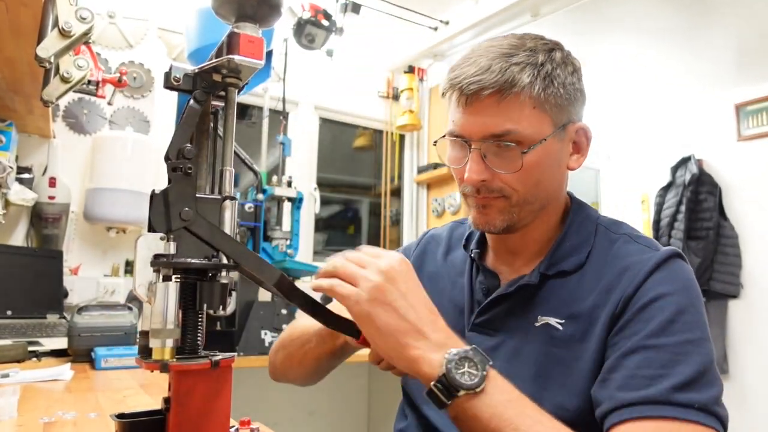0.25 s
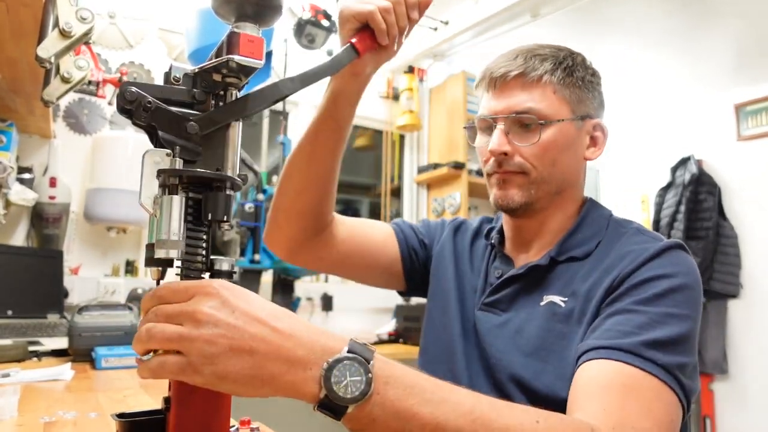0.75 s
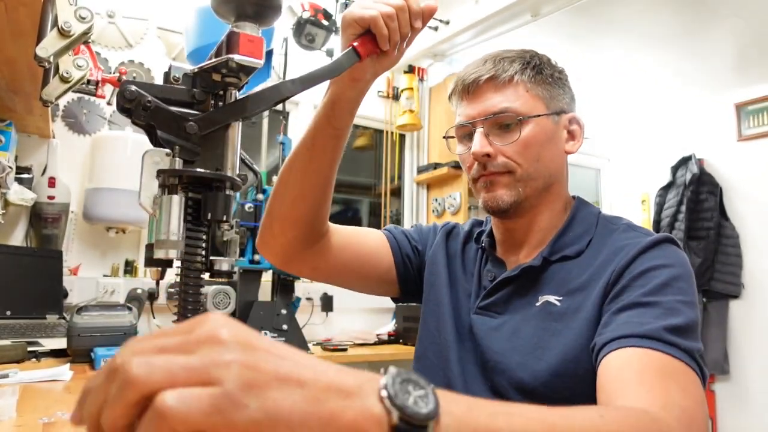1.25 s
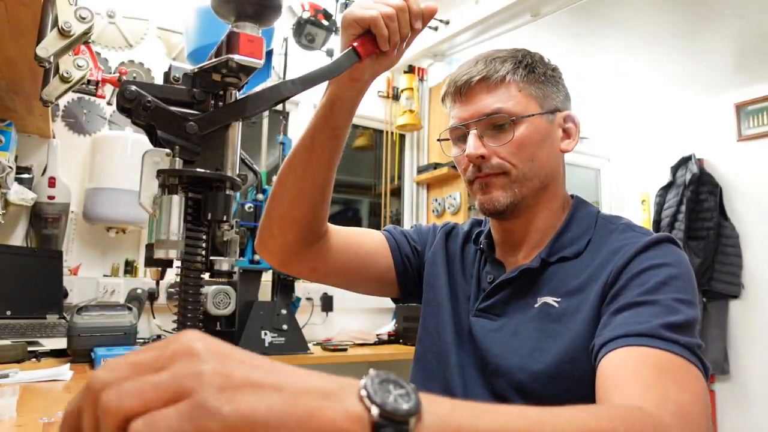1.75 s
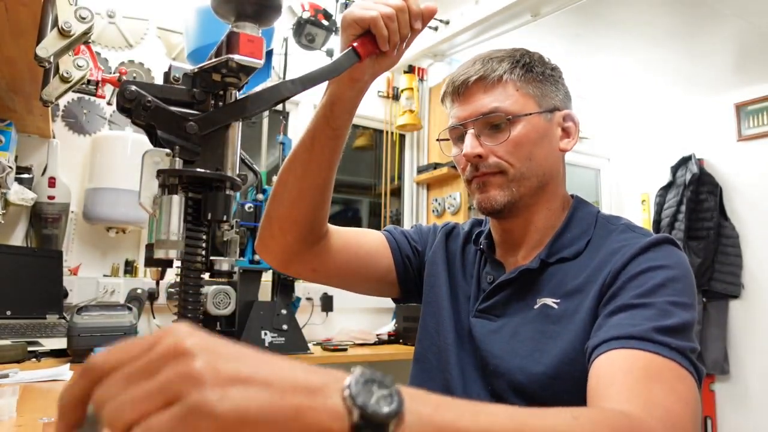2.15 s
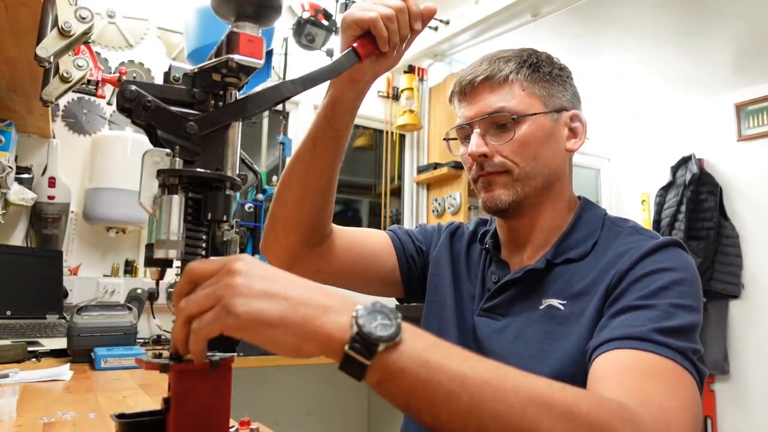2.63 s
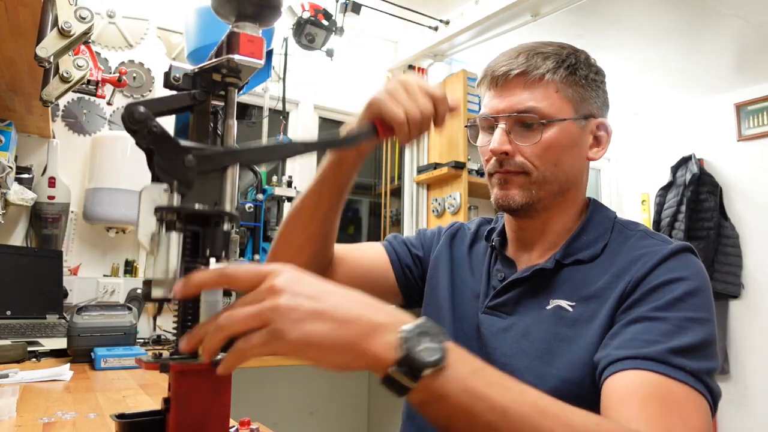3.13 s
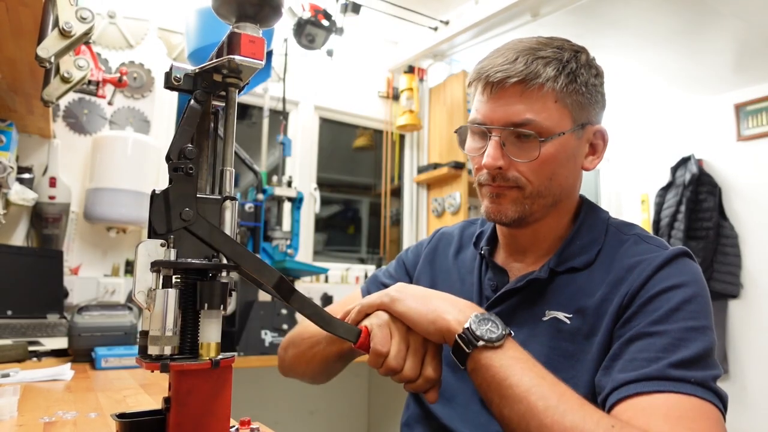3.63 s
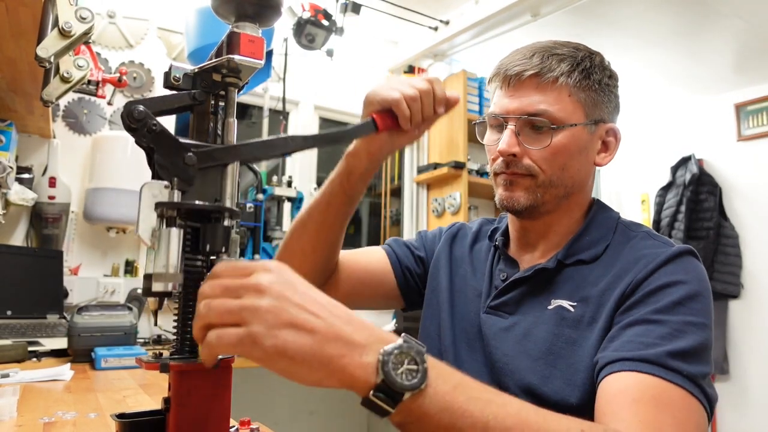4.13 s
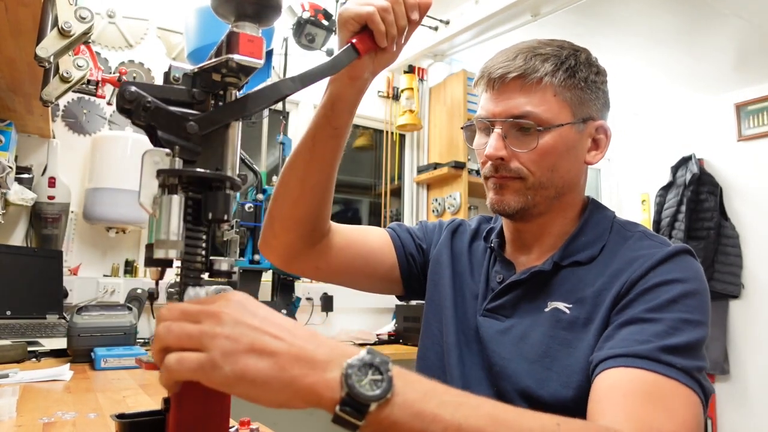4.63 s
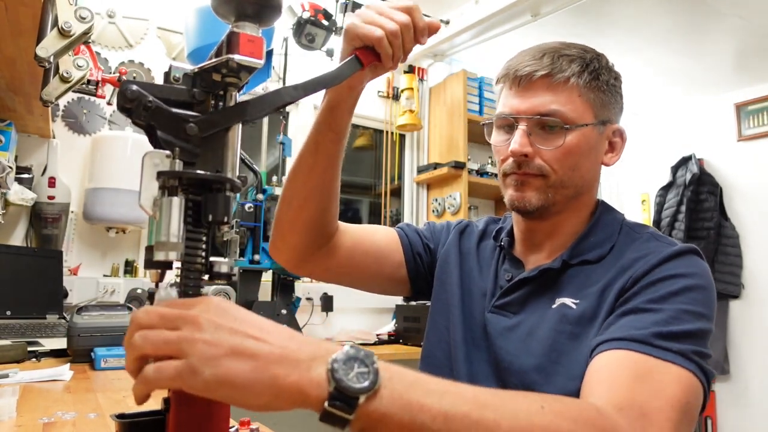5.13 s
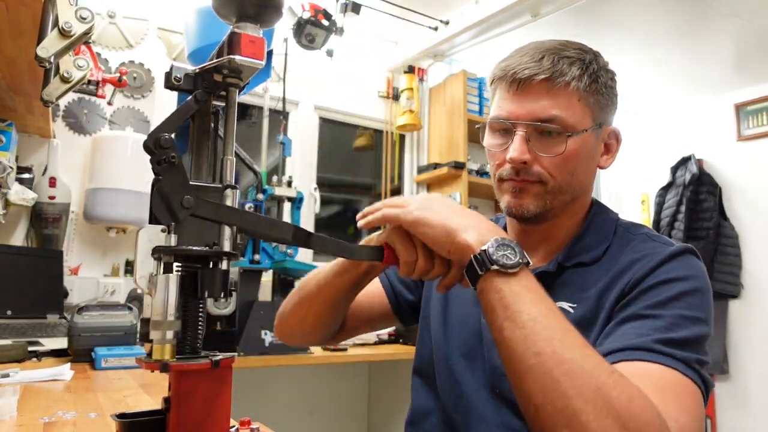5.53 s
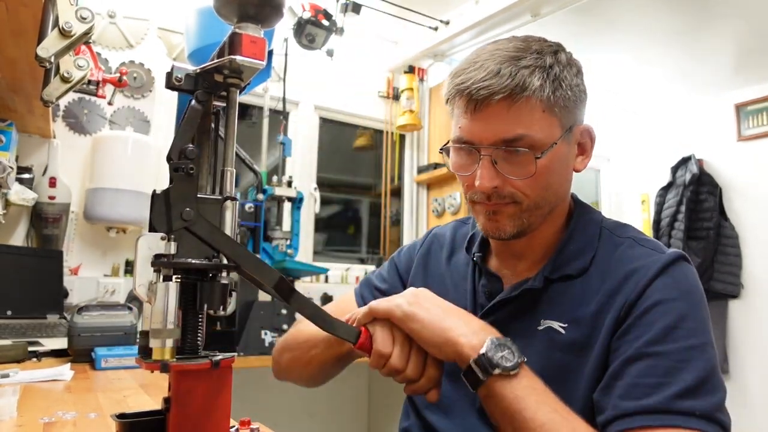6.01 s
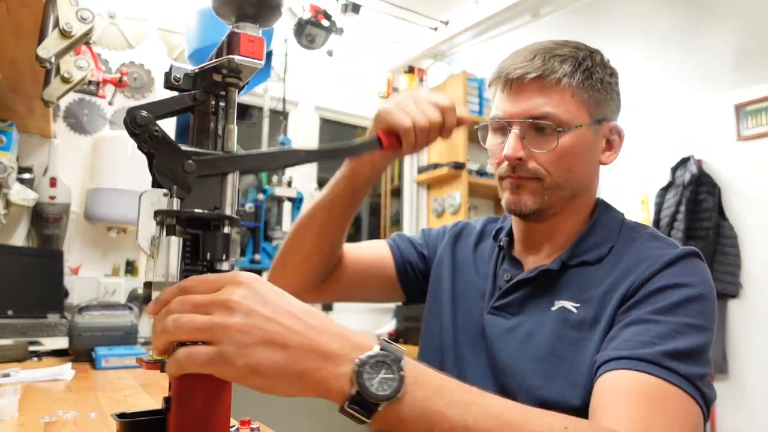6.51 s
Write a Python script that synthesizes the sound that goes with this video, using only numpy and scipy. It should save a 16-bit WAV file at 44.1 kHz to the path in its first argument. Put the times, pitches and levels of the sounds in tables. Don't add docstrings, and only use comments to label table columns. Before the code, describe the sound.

A lever-operated bench press bangs against its stops in a small workshop, loose linkage rattling between blows while light parts knock and shuffle.

```python
import sys
import numpy as np
from scipy import signal
from scipy.fft import rfft, irfft, next_fast_len
from scipy.io import wavfile
from scipy.ndimage import uniform_filter1d, map_coordinates

SR = 44100
rng = np.random.default_rng(int(sys.argv[2]) if len(sys.argv) > 2 else 0)


def invert_db(x):
    u = np.asarray(x, float) / 20
    return 10 ** u


def store_pcm(level_fs):
    pcm = np.round(np.clip(level_fs, -1, 1) * 32767).astype(np.int16)
    wavfile.write(sys.argv[1], SR, np.atleast_2d(pcm).T)


N = 298116


def unit(x):
    return x / np.sqrt(np.mean(x ** 2) + 1e-20)


def along(points, hz):
    f, v = np.transpose(points)
    return np.interp(np.log(hz + 1), np.log(f + 1), v)


def filtered(x, response):
    m = next_fast_len(N + SR // 2)
    return irfft(rfft(x, m) * response(np.fft.rfftfreq(m, 1 / SR)), m)[..., :N]


def noise(spectrum):
    white = rng.standard_normal((2, N))
    return unit(filtered(white, lambda hz: invert_db(along(spectrum, hz))))


def add(out, s, sound):
    part = out[:, round(s * SR):][:, :sound.shape[1]]
    part += sound[:, :part.shape[1]]


def ringing(hz, peaks):
    return sum(invert_db(db) * 1j * hz * width / (centre * centre - hz * hz + 1j * hz * width)
               for centre, width, db in peaks)


def resonant(x, peaks):
    return filtered(x, lambda hz: 1 + ringing(hz, peaks))


# frequency in Hz, t60 in seconds.
ROOM_T60 = [(100, 0.57), (300, 0.26), (1000, 0.3), (4000, 0.36), (9000, 0.38), (15000, 0.22)]


def blow(db, thump_db, knock_db, bright_db, crack_db, sub_db=0, body_db=7, room_db=-8, deep_db=0, edge_db=0):
    t = np.arange(SR * 3 // 5) / SR
    low_db = thump_db + sub_db
    colour = [(40, low_db + deep_db), (150, low_db - 1.5), (450, thump_db + 11.0),
              (1000, knock_db + 7.0), (1500, knock_db + 5.5 + edge_db), (2100, -0.048), (6000, 0.32),
              (11000, bright_db + 4.0), (16000, bright_db + 2.0)]
    hz, frame_s, z = signal.stft(rng.standard_normal((3, len(t))), SR, nperseg=256)
    uneven_db = 2.2 * rng.standard_normal(len(hz))
    z = z * invert_db(along(colour, hz) + uneven_db)[:, None]
    fall_db = 60 * frame_s / along(ROOM_T60, hz)[:, None]
    late_db = room_db - 42.5 - 60 * frame_s / 3.7
    z[1:] *= invert_db(room_db - fall_db) + invert_db(late_db)
    near, mid, side = signal.istft(z, SR, nperseg=256)[1][:, :len(t)]

    touches_per_s, touch_most = 350, 1.5
    size = np.minimum(rng.exponential(size=len(t)), touch_most)
    touches = 1.45 * size * (rng.random(len(t)) < touches_per_s / SR)
    chatter = 0.6 + signal.lfilter([1], [1, -0.975], touches)

    crack = uniform_filter1d(near, size=3) * invert_db(crack_db + 2 - 60 * t / 0.0037)
    near = crack + near * chatter * invert_db(body_db - 14.5 - 60 * t / 0.067)
    low, high = 1 + 0.12 * rng.standard_normal(2)
    near += invert_db(crack_db + thump_db - 14.5 - 60 * t / 0.045) * np.sin(2 * np.pi * 440 * low * t)
    near += invert_db(crack_db + knock_db - 12.5 - 60 * t / 0.019) * np.sin(2 * np.pi * 1100 * high * t)
    near *= 1 - np.exp(-t / 0.00065)
    swell = (1 - np.exp(-t / 0.00086)) * (1 - t / t[-1])
    return invert_db(db - 14) * np.array([near, swell * mid, swell * side])


def struck(sound, part, far):
    m = next_fast_len(sound.shape[1] + 2048)
    detune = 0.013 * rng.standard_normal()
    hz = np.fft.rfftfreq(m, 1 / SR) * (1 + detune)
    share = np.array([[1.3], [far], [far]])
    return irfft(rfft(sound, m) * (1 + share * ringing(hz, part)), m)


def contacts(rows, part, force_db, crack_db, shake_db, far):
    out = np.zeros((3, N))
    for s, db, thump_db, knock_db, bright_db in rows:
        hit = blow(db + force_db, thump_db, knock_db, bright_db, crack_db, shake_db,
                   deep_db=1.7 * shake_db - 4)
        add(out, s, struck(hit, part, far))
    return out


# start in seconds, peak in dB, thump 150-700 Hz in dB,
# knock 700-2000 Hz in dB, bright 8-15 kHz in dB.
SLAMS = [(0.0228, -17.5, 4, 0.5, -6), (0.0355, -12, -9, -1, -5.5), (0.0737, -17.5, -35, -2.5, -2),
         (0.055, -17, -16, -11, 1), (0.0962, -10, -17, -10, -3.5), (3.5855, -7, -6.5, 3.5, -16),
         (3.5991, -11.5, -8, -21, -1), (3.6347, -18, -43, -31, 1.5), (5.4807, -22, -5.5, 2, -11),
         (5.4909, -18.5, 0.5, 1.5, -7), (5.5162, -11, -10, -15, -3.5), (5.994, -15.5, 0.5, -4.5, -6),
         (6.0145, -12.5, -51, -5, -3), (6.0496, -18, -36, -4, 3), (6.0684, -12, -16, -10, -3.5)]
# frequency in Hz, width in Hz, level in dB.
RAM = [(2040, 170, -8), (7200, 300, -2.5), (858, 29, -2.5)]


def ram_slams():
    return contacts(SLAMS, RAM, force_db=15, crack_db=1.5, shake_db=4, far=.5)


LIFTS = [(0.4538, -12, -5, 3.5, -2), (0.4605, -13.5, 0.5, -1, -18), (0.4773, -3.5, -11, -3, -14),
         (0.4944, -6, -5.5, 3.5, -10), (0.5194, -8.5, -8, -1.5, -2), (0.535, -14, -1.5, 6.5, 4),
         (0.5731, -15, -20, -1, 0), (0.6094, -25.5, 9, 7.5, -10), (0.6384, -22, 0, 1.5, -16),
         (0.6784, -16.5, -14, -1.5, -2), (6.5834, -29, 10.5, 4, 0), (6.6528, -20, -10, 1.5, 0),
         (6.6912, -19.5, -9, -20, -11)]
LEVER = [(2270, 240, 5.4), (460, 78, 0.63)]


def lever_lifts():
    return contacts(LIFTS, LEVER, force_db=6, crack_db=2.5, shake_db=1, far=.6)


TOPS = [(0.7384, -2.5, 0, 1.5, -8), (0.752, -7.5, -12, -2, -11), (0.765, -7.5, -2, -4, -6),
        (0.7745, -2, -7, -4, -16), (0.787, -18, -7, -11, -2), (0.8001, -8, -11.5, 0.5, -8.5),
        (0.817, -15, -6, -5, -11), (0.8483, -24, -2, -3, -8), (0.8829, -16, -33, -10, -28),
        (0.9042, -18.5, -16, 0, 0.5), (4.3696, -21.5, 7, 11, -16), (4.3848, -13.5, 0.5, 1, -7.5),
        (4.3983, -10, 0, -3, -10.5), (4.4282, -17.5, 2, 0, -14), (6.7107, -26.5, 6.5, 4, -13.5),
        (6.7352, -17.5, 11, 13.5, -16), (6.7438, -10, 1, -6, -8)]
FRAME = [(9530, 190, 4.3), (2080, 470, 0.5), (440, 260, 0.61), (887, 18, 0.98)]


def top_stops():
    return contacts(TOPS, FRAME, force_db=7, crack_db=2.2, shake_db=-3, far=.6)


RETURNS = [
    (3.996, -30.5, 9.5, 11, -8),
    (4.0285, -16.5, 6, 9.5, -6),
    (4.0335, -18, -1, 10.5, -1),
    (4.0901, -27, -8, 6.5, 7),
    (4.1041, -23, -2, 3, 1),
    (4.111, -29, -11, 8, -2),
    (4.187, -28, 2, -1, -15),
]
LINKAGE = [(6350, 260, 15.5), (8340, 230, 9.2), (9250, 68, 4), (1130, 46, 2), (2300, 530, 10.7),
           (7200, 170, 3.4)]


def linkage_returns():
    return contacts(RETURNS, LINKAGE, force_db=3, crack_db=5, shake_db=-1, far=.45)


CLACKS = [
    (6.357, -33, -8, -12, -15),
    (6.364, -28, 2, 6.5, -27),
    (6.388, -9, 5.5, 1, -3.5),
    (6.3995, -10, -6, -7, -12),
    (6.4122, -5, -9.5, -0.5, -15),
    (6.432, -14, -6, -1, -18),
    (6.4562, -13, -2, 7, -17),
    (6.4605, -6.5, -14.5, 3.5, -4),
    (6.521, -29.5, 3, 3, -5),
]
TOGGLE = [(476, 57, 6.9), (847, 43, 2.7), (2000, 470, 4), (4720, 81, 1), (6350, 150, 8), (11100, 68, 1.5)]


def toggle_clacks():
    return contacts(CLACKS, TOGGLE, force_db=3, crack_db=5, shake_db=-1, far=.6)


SNAPS = [
    (3.8934, -5, -12, -6.5, -21),
    (5.1709, -25.5, -2, -4, -13),
    (5.6164, -10, -40, -3.5, -15),
]
CATCH = [(885, 60, 2.2), (1610, 20, 1.3), (2250, 240, 2), (2810, 130, 6.3), (3970, 47, 1.8)]


def catch_snaps():
    return contacts(SNAPS, CATCH, force_db=1.5, crack_db=6, shake_db=3, far=.8)


SEATS = [
    (3.2333, -25.5, 0, -3, 3.5),
    (3.3274, -28, -20, -2, -3),
    (3.337, -21.5, -13, 0, -26),
    (3.3785, -9.5, -15, -5.5, -7),
    (3.533, -23.5, -9.5, 2.5, -20),
    (3.540, -34, -14, -1, 6),
]
PLATE = [(2170, 610, 8.2), (2750, 350, 4.2), (3650, 290, 4.1), (5400, 340, 3.2), (7200, 480, 4),
         (400, 72, 1.4)]


def shell_seats():
    return contacts(SEATS, PLATE, force_db=1.5, crack_db=6, shake_db=3, far=1.2)


DROPS = [
    (1.6102, -32, -13, 3, -34),
    (1.6245, -36, -1, 1, -13),
    (1.6581, -4, -3.5, -6.5, -15),
    (1.678, -10, -6, 4, -37),
    (1.7141, -16, 4.5, 12, -30),
    (1.7418, -22, 4, 14, -10),
    (1.647, -37, -13, 0, -15),
    (1.759, -37, 12, 6, -13),
    (1.822, -58, -9, 5, -16),
]
BIN = [(178, 17, 13.3), (443, 30, 5.8), (654, 70, 2.5), (1060, 42, 1.6), (1283, 81, 3.5), (2350, 480, 9.5)]


def bin_drops():
    return contacts(DROPS, BIN, force_db=3, crack_db=4.5, shake_db=-7, far=.8)


SHELLS = [
    (2.7337, -22, -23, -5, 0),
    (2.9379, -22, -5, -2, -20),
    (2.9495, -18.5, 5, 4, -3.5),
    (2.955, -16.5, -2.5, 2.5, -53),
    (3.1057, -11.5, -4, 1, -4),
    (4.7726, -20.5, -7.5, -10.5, -13),
    (5.1604, -28, -12, -13, -3.5),
    (5.2801, -9.5, -2.5, -3, 1),
    (5.3746, -19, -5.5, -12, 0),
]
HULL = [(450, 180, 2.4), (870, 330, 5.3), (2300, 770, 5.7), (3900, 170, 1), (6200, 2900, 3.7)]


def shell_knocks():
    return contacts(SHELLS, HULL, force_db=3, crack_db=5.5, shake_db=-2, far=.6)


STANDS = [
    (2.5636, -7.5, -21, -12, -1),
    (2.607, -26, -8, -38, -9),
]
BASE = [(315, 29, 6.6), (2300, 400, 5), (2720, 190, 2.9), (5460, 500, 1.5), (8300, 620, 1.5),
        (9950, 540, 1.5)]


def shell_stands():
    return contacts(STANDS, BASE, force_db=1.5, crack_db=6, shake_db=3, far=.9)


PICKS = [
    (2.1603, -30.5, -6, -6, -38),
    (2.176, -33, -4, -8, -22),
    (2.186, -30.5, -9, -7, -7),
    (2.192, -32.5, -6, -4, -13),
]
TRAY = [(4500, 390, 12), (3300, 160, 4), (6600, 130, 4), (2200, 630, 6.6), (240, 44, 2.3)]


def tray_picks():
    return contacts(PICKS, TRAY, force_db=1.5, crack_db=6, shake_db=-7, far=.6)


# start in seconds, peak in dB, body under 2 kHz in dB, bright 8-15 kHz in dB.
TICKS = [(0.426, -28.5, 2, -10), (1.213, -43, -20, -2), (2.003, -38, -14, -14), (2.43, -34, -34, -5),
         (2.531, -50, -8, 12), (2.828, -29, -6, -16), (2.895, -31.5, -13.5, -5), (3.858, -28.5, -30, -9),
         (4.6502, -27, -10, -9), (4.8158, -16, -18, -5), (4.882, -24, -34, -7), (4.9486, -33, -33, -11),
         (4.69, -36, -22, -7), (4.726, -34, -15, -7), (4.846, -25, -26, -7), (5.0276, -31, -27.5, -11),
         (5.0576, -37, -18, 1), (5.1226, -36, -13, 2), (5.8849, -29, 7.5, -9), (5.904, -21.5, 2, -47),
         (6.315, -33.5, 3, -5)]


def part_ticks():
    out = np.zeros((3, N))
    for s, db, body_db, bright_db in TICKS:
        add(out, s, blow(db, body_db - 19, body_db - 0.5, bright_db, crack_db=10.5))
    return out


# start in seconds, peak in dB, knock 700-2000 Hz in dB, click 2-8 kHz in dB.
PUSHES = [(0.001, -28.5, 0, 16.5), (0.3, -15.5, -11, -2), (0.331, -20, -8.5, 6), (0.446, -27, 7, -2),
          (1.022, -30.5, -7, -33), (1.445, -26.5, 3.5, 4.5), (1.455, -31, -5, -10), (1.463, -41, -16, -10),
          (3.828, -24, -17, -37), (5.089, -28.5, -9, -11), (5.249, -35, -3, 8), (5.601, -22, -1, 25),
          (5.673, -27, -17, -16), (6.268, -22, -15, 2), (6.319, -26.5, -4, -14)]
TABLETOP = [(219, 61, 2), (445, 440, 1.5), (810, 110, 5)]


def bench_pushes():
    out = np.zeros((3, N))
    for s, db, knock_db, click_db in PUSHES:
        add(out, s, blow(db + click_db - 10, 10.0 - click_db, 11.0 + knock_db - click_db, -10.0,
                         crack_db=9.5, sub_db=7.0, body_db=11.0, room_db=-5.0, deep_db=-13, edge_db=-4))
    return invert_db(-5.0) * resonant(out, TABLETOP)


BENCH = [(122.4, 15.7, 12), (254.5, 57.5, 5.5), (360, 114, -4.5), (520, 53, -14), (814, 18, -1.5)]


def press():
    sound = ram_slams() + lever_lifts() + top_stops() + linkage_returns() + toggle_clacks()
    sound += catch_snaps() + shell_seats() + bin_drops() + shell_knocks()
    sound += shell_stands() + tray_picks() + part_ticks() + bench_pushes()
    near, mid, side = resonant(sound, BENCH)
    return np.array([near + mid, 0.91 * side])


# start in seconds,
# frequency in Hz, level in dB, t60 in seconds.
PINGS = [(0.4545, 950, -17, 0.028), (0.4797, 2520, -25, .012), (0.5191, 760, -13, 0.013),
         (0.5735, 6600, -14.5, 0.015), (0.641, 3650, -27.5, 0.013), (0.7375, 550, -6.5, 0.03),
         (0.765, 506, -17, 0.034), (0.884, 3240, -23, .015), (0.904, 1000, -27, 0.031),
         (1.66, 510, -23.5, 0.044), (1.664, 2250, -24, 0.098), (1.7138, 634, -13, 0.022),
         (1.739, 1240, -16.5, 0.029), (1.759, 1110, -18, 0.014), (2.186, 4500, -33.5, .05),
         (2.19, 3300, -45, 0.058), (2.19, 6600, -51, .1), (2.7338, 6300, -20, 0.012),
         (2.951, 520, -17.5, 0.015), (3.1055, 780, -9.5, 0.011), (3.38, 2200, -19, 0.0098),
         (3.394, 2480, -28, 0.039), (3.54, 4970, -32, .04), (4.028, 676, -13, 0.016),
         (4.034, 6350, -22.5, 0.034), (4.0895, 6470, -19.5, 0.018), (4.09, 1090, -21.5, 0.065),
         (4.105, 7200, -19, 0.017), (4.105, 9250, -31, .14), (4.371, 633, -14.5, 0.035),
         (4.398, 6600, -20.5, 0.036), (4.773, 2300, -44, 0.0088), (5.2795, 740, -18.5, 0.033),
         (5.481, 2080, -24.5, 0.043), (5.492, 580, -16, 0.048), (5.883, 3930, -44, 0.035),
         (5.885, 10200, -51, .06), (5.995, 728, -17, 0.036), (6.363, 2200, -30, 0.018),
         (6.388, 710, -17, 0.015), (6.457, 700, -18, 0.015), (6.7356, 510, -8, 0.02),
         (0.302, 875, -41, 0.13), (0.328, 410, -35, 0.046), (0.343, 334, -34, 0.054),
        (1.795, 520, -43, 0.13), (1.995, 125, -60, .12), (2.18, 202, -50, 0.16), (2.735, 2820, -33, .02),
        (2.9495, 1740, -13, .008), (3.392, 3650, -28, 0.055), (3.41, 2750, -32, 0.19),
        (4.034, 614, -15, 0.014), (4.039, 2350, -29, 0.085), (4.106, 1870, -35, 0.13),
        (4.124, 1120, -37, 0.1), (4.206, 420, -38, .025), (6.412, 1560, -14.5, 0.02),
        (6.586, 760, -40, .08), (3.9, 392, -36, 0.092), (4.372, 392, -13.5, .07), (1.444, 720, -45, 0.072),
        (1.445, 1160, -49, 0.1), (1.454, 197, -44, .15), (4.15, 387, -46.5, 0.18),
        (0.4605, 520, -12.5, 0.0067)]


def pings():
    out, t = np.zeros((2, N)), np.arange(SR // 5) / SR
    for s, hz, db, t60_s in PINGS:
        lower = np.sin(2 * np.pi * hz * 0.91 * t + 2 * np.pi * rng.random())
        pair = np.sin(2 * np.pi * hz * t) + 0.44 * lower
        fade = invert_db(db - 60 * t / t60_s) * (1 - np.exp(-t / 0.00042))
        add(out, s, fade * pair * [[1], [.4]])
    return out


# start in seconds, level in dB, free ringing in seconds, upper mode in dB.
RINGS = [
    (0.0357, -20, 0.023, 0),
    (0.074, -25.5, 0.059, -5),
    (0.469, -26, .04, -16),
    (3.597, -20, 0.033, -7),
    (3.628, -20, .02, -10),
    (3.73, -45.5, 0.065, -10),
    (5.498, -26.5, 0.042, -15),
    (5.516, -19, 0.064, -25),
    (6.006, -24.5, 0.035, -3),
    (6.045, -26.5, 0.088, -2),
]


def bell():
    t60_s, damped_db_per_s = 0.36, 500
    out, t = np.zeros((2, N)), np.arange(SR // 2) / SR
    for s, db, free_s, upper_db in RINGS:
        wander = 0.035 * np.cumsum(rng.standard_normal((2, len(t))), axis=1)
        lower = np.sin(2 * np.pi * 3993 * t + wander[0])
        upper = np.sin(2 * np.pi * 4055 * t + wander[1])
        level_db = db - 60 * t / t60_s - damped_db_per_s * np.maximum(t - free_s, 0)
        fade = invert_db(level_db) * (1 - np.exp(-t / 0.0015))
        add(out, s, fade * (lower + invert_db(upper_db) * upper) * [[1], [.5]])
    return out


# start in seconds, length in seconds, frequency in Hz, level in dB.
SQUEAKS = [
    (1.062, 0.14, 4180, -65),
    (3.073, 0.032, 4300, -61),
    (6.533, 0.034, 4250, -60),
    (6.582, 0.05, 15000, -58),
]


def squeaks():
    out = np.zeros((2, N))
    for s, length_s, hz, db in SQUEAKS:
        t = np.arange(round(length_s * SR)) / SR
        wander = np.cumsum(rng.standard_normal(SR // 4))[:len(t)]
        whistle = np.sin(2 * np.pi * hz * t + 0.072 * wander)
        add(out, s, invert_db(db) * np.sin(np.pi * t / length_s) * whistle * [[1], [.8]])
    return out


# start in seconds, length in seconds, start level in dB, end level in dB.
SLIDES = [
    (2.78, 0.12, -35, -69),
    (4.14, 0.234, -59, -45),
    (4.52, 0.14, -38.5, -68),
    (4.63, 0.17, -46.5, -45.5),
    (4.75, 0.23, -36, -65),
    (5.62, 0.23, -37, -57.5),
    (5.82, 0.058, -47, -54),
]
# frequency in Hz, density in dB per Hz.
RUB = [(350, -55), (600, -32), (657, -7), (1760, -13), (2230, 1.5), (3210, -6), (4660, 2), (9000, -2.5),
       (11700, -14), (19800, -120)]
RUSTLE = [
    (1.04, 0.3, -57, -75),
    (1.86, 0.095, -47, -53.5),
    (1.97, 0.2, -47.5, -78),
    (2.165, 0.069, -44, -80),
]
RUSTLE_TONE = [(1500, -6), (3000, -14), (4300, 2), (4900, 6), (5600, -4), (7500, -11), (10000, -37)]
GROANS = [
    (3.13, 0.072, -33, -53),
    (3.2, 0.25, -39, -50),
    (4.13, 0.27, -47, -42.5),
    (5.3, 0.19, -35, -39),
    (5.82, 0.092, -43, -42),
]
GROAN_TONE = [(120, -75), (250, -3), (390, 1.5), (600, -3), (860, -5), (1300, -10.5), (2500, -21.5)]
RUB_BRIGHT = [(4500, -30), (8000, -3), (12000, -4), (16000, -5)]


def slides():
    grain = invert_db(2.0 * map_coordinates(rng.standard_normal(N // 100 + 4), [np.arange(N) / 100]))
    bright = unit(grain * noise(RUB_BRIGHT))
    out = np.zeros((2, N))
    kinds = ((SLIDES, RUB, -5), (RUSTLE, RUSTLE_TONE, -6), (GROANS, GROAN_TONE, -30))
    for strokes, spectrum, bright_db in kinds:
        rub = unit(grain * noise(spectrum)) + invert_db(bright_db) * bright
        for s, length_s, start_db, end_db in strokes:
            t = np.arange(round(length_s * SR)) / SR
            fade = np.clip(np.minimum(t, length_s - t) / 0.043, 0, 1)
            level_db = start_db + (end_db - start_db) * t / length_s - 4.5
            add(out, s, fade * invert_db(level_db) * rub[:, round(s * SR):][:, :len(t)])
    return out


# time in seconds, level in dB.
SWAY = [(0.05, -30.5), (0.73, -31), (1.7, -51), (3.0, -39), (3.18, -40), (3.62, -38), (4.4, -35.5),
        (4.85, -46), (5.2, -36), (5.52, -27.5), (6.02, -29), (6.74, -55)]
SWAY_TONE = [(20, -19), (55, -10), (118, 7.5), (200, -14.5), (400, -7), (800, -61)]


def bench_sway():
    rise_db_per_s, fall_db_per_s = 115, 94
    t = np.arange(N) / SR
    load = sum(invert_db(db - np.maximum(rise_db_per_s * (s - t), fall_db_per_s * (t - s))) for s, db in SWAY)
    return load * invert_db(-14.5) * noise(SWAY_TONE)


AIR = [(15, -70), (25, -66), (100, -10), (165, -4.5), (205, 3), (270, -3.5), (553, -8), (854, -9.5),
       (1470, -11.5), (1600, -12), (1930, -13), (4860, -19.5), (15200, -23.5), (16500, -45)]


def workshop_air():
    air_db = -63
    drift_db = 1.2 * map_coordinates(rng.standard_normal(N // 9000 + 4), [np.arange(N) / 9000])
    return invert_db(air_db + drift_db) * noise(AIR) * invert_db([[0], [6]])


# frequency in Hz, level in dB.
APART = [(60, -27), (250, -11.5), (1000, -9.5), (8000, -9.5), (15000, -10)]


def scene():
    mid, side = press() + pings() + bell() + squeaks() + slides() + bench_sway() + workshop_air()
    side = filtered(side, lambda hz: invert_db(along(APART, hz)))
    return np.array([mid + side, mid - side]) * invert_db([[.6], [-.6]])


# frequency in Hz, level in dB.
MIC = [(100, -4), (1000, -5.5), (15400, -9), (16000, -16), (16900, -100)]


def capsule(hz):
    low_cut_hz = 54
    u = 1j * hz / low_cut_hz
    return invert_db(along(MIC, hz)) * (u * u / (1 + 1.145 * u + u * u)) ** 2


def low_pass(x):
    return signal.sosfilt(signal.butter(12, 16970, fs=SR, output="sos"), x)


def record(dry):
    x = filtered(dry, capsule)
    knee_db, release_db_per_s, squeeze = -20, 300, .9
    ramp_db = release_db_per_s * np.arange(N) / SR
    level_db = 20 * np.log10(np.abs(x).max(0) + 1e-9)
    held_db = np.maximum.accumulate(level_db + ramp_db) - ramp_db
    cut_db = squeeze * np.maximum(held_db - knee_db, 0)
    cut_db = uniform_filter1d(cut_db, size=71, origin=26)
    x = x * invert_db(-cut_db + 13.0)
    x = x / (1 + np.abs(x / .7) ** 4) ** (1 / 4)
    return low_pass(x)


dry = scene()
out = record(dry)
store_pcm(out)
```